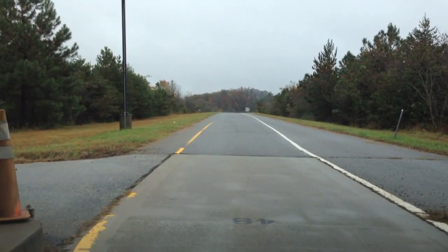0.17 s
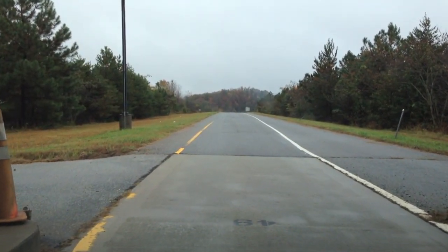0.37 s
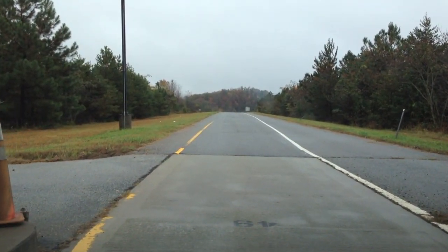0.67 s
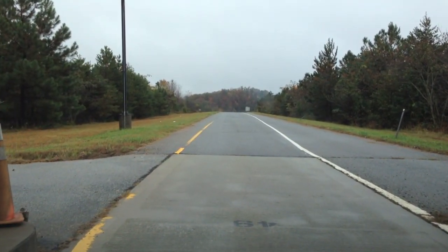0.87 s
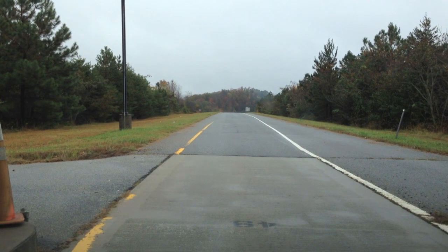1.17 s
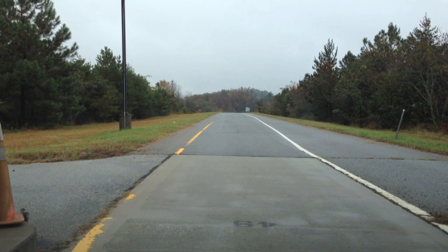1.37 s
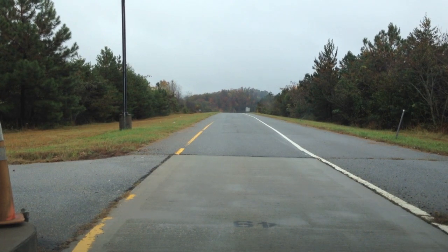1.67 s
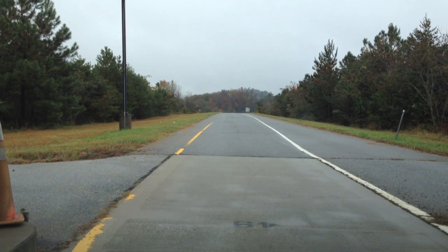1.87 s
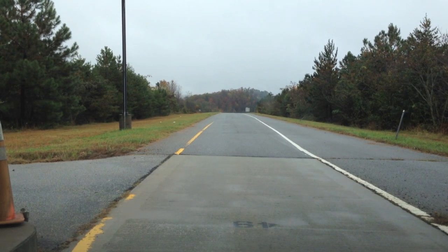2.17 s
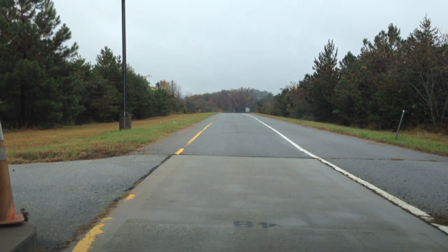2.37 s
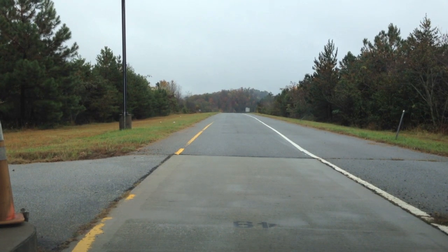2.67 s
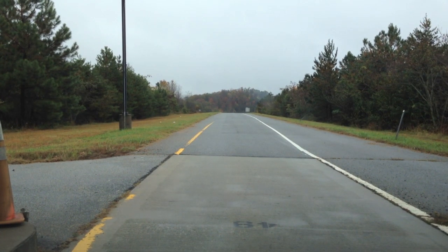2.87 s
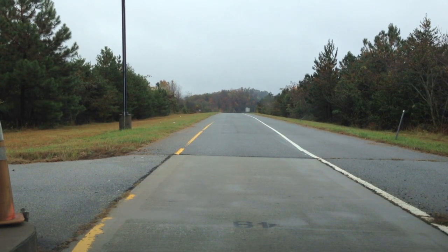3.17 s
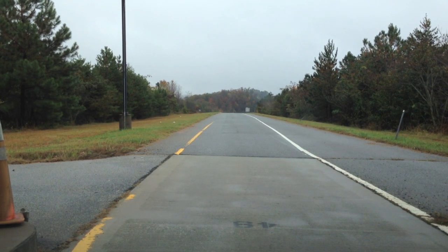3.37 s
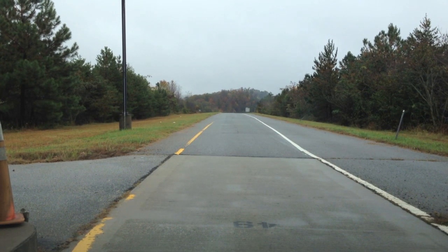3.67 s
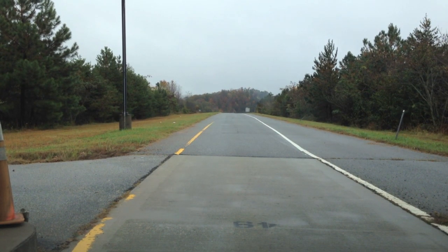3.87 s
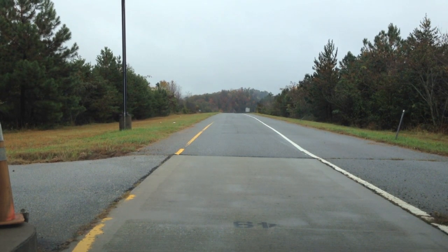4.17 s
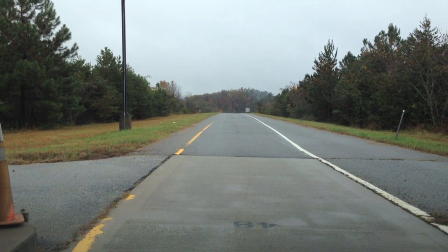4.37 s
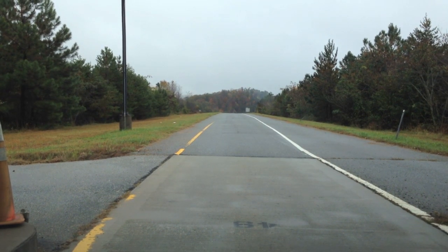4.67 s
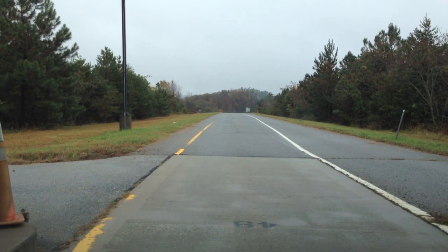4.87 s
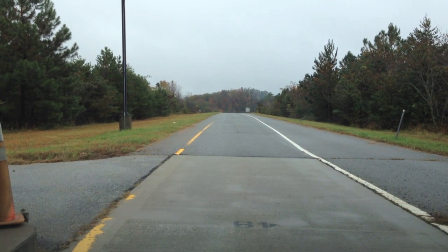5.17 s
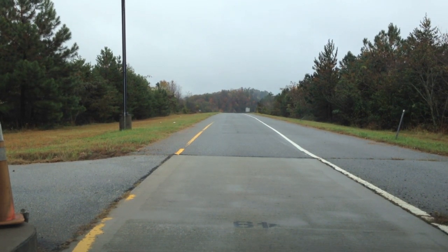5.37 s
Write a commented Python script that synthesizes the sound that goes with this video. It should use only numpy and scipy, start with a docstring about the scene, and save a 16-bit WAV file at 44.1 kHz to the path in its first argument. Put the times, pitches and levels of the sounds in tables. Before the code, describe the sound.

In an idling car at a roadside toll machine, hard knocks and door rattles frame coins clinking and rolling in a plastic basket.

```python
"""Inside a car idling at a toll machine, engine rumble, an outdoor wash and a hiss last throughout as filtered noise.
Loose door trim rattles around hard knocks: noise bursts, with damped panel and cabin modes under the knocks.
Coins click in the hand, then hit a plastic basket, glance off its steel throat and roll round the basket:
noise clinks and ringing modes, the rolling a fading run of tiny ones. At the end the knocks and rattles return."""
import sys
import numpy as np
from scipy import signal
from scipy.fft import rfft, irfft, next_fast_len
from scipy.io import wavfile
from scipy.ndimage import map_coordinates

SR = 44100
rng = np.random.default_rng(int(sys.argv[2]) if len(sys.argv) > 2 else 0)


def master(y):
    """Save y as 16-bit WAV."""
    cut = np.clip(np.atleast_2d(y).T, -1, 1)
    pcm = np.round(cut * 32767)  # scale
    wavfile.write(sys.argv[1], SR, pcm.astype(np.int16))


N = 243873

# Spectrum of a bright crack or click: (frequency [Hz], relative density [dB per Hz])
CRACK_SPECTRUM = [(900, -32), (2000, 4.5), (2550, 7.5), (3050, -11.5), (3600, -4.5), (4300, 1.5), (6300, 4),
                  (8500, -2.5), (11000, -15.5), (15000, -12)]
# Spectrum of the rap or body of a coin contact: (frequency [Hz], relative density [dB per Hz])
RAP_SPECTRUM = [(200, -12), (500, -19.5), (700, 6), (1350, 4.5), (1800, -0.5), (2500, 0), (3000, -17),
                (6000, -25.5)]
# Spectrum of a coin's scratch: (frequency [Hz], relative density [dB per Hz])
SCRATCH_SPECTRUM = [(1500, -9.5), (2800, -9), (4200, -4), (5300, 0), (6700, 2.5), (8200, -2), (9600, -9.5),
                    (11500, -15.5), (13500, -16), (15200, -9)]
# Modes of the plastic basket: (frequency [Hz], relative level [dB], t60 [s])
BASKET_MODES = [(697.5, -3.5, 0.23), (747, 1.5, 0.4), (865, 0.5, 0.18), (1095, 0.5, 0.43), (1228, -9, 0.5),
                (1311, 9, 0.19), (1572, 3, 0.086), (1800, -8, 0.4), (2155, -1.5, 0.41), (2790, -16, 0.61),
                (3440, -19, 0.77), (5400, -17, 0.45), (6400, -26, 0.27), (7040, -25, 0.3)]
# Modes of the bright ring heard with coin contacts, with a thin high whistle near 15 kHz:
# (frequency at pitch factor 1 [Hz], relative level [dB], t60 [s])
BRIGHT_MODES = [(9243, -6.5, 0.0764), (10180, -12, 0.097), (15180, -12, 0.166), (15200, -8, 0.168)]


def amp(db):
    """Level law: 20 dB is a factor of ten in amplitude."""
    return 10 ** (np.asarray(db) / 20)


def unit(x):
    """Normalisation: scale to an rms of 1."""
    return x / np.sqrt(np.mean(x ** 2) + 1e-20)


def curves(rows):
    """Linear interpolation in time: one value per sample for each column after the time."""
    s, *columns = np.transpose(rows)
    t = np.arange(N) / SR
    return [np.interp(t, s, column) for column in columns]


def wobble(rate):
    """Slow random modulation: a smooth curve through `rate` random knots a second."""
    knots = rng.standard_normal(int(N * rate / SR) + 4)
    return map_coordinates(knots, [np.arange(N) * rate / SR])


def noise(spectrum, size, peaky_db=0, spacing_hz=55):
    """Spectral shaping: noise of rms 1, coloured by a spectrum and fresh narrow resonances."""
    hz, db = np.transpose(spectrum)
    grid = np.fft.rfftfreq(size, 1 / SR)
    peaks = map_coordinates(rng.standard_normal(SR // 20), [grid / spacing_hz], mode="wrap")
    colour_db = np.interp(np.log(grid + 1), np.log(hz), db)
    gain = amp(colour_db + peaky_db * np.tanh(peaks / 2) * 2)
    white = rfft(rng.standard_normal(size))
    return unit(irfft(white * gain, size))


def fade(rise, t60):
    """Exponential damping: half a second that swells with time constant `rise` and falls 60 dB per t60."""
    t = np.arange(SR // 2) / SR
    swell = 1 - np.exp(-t / max(rise, 1 / SR))
    return swell * amp(-60 * t / t60)


def burst(spectrum, rise, t60, tail_db, tail_t60, peaky_db=0):
    """Early reflections and reverberation: a smeared contact with a weaker, longer tail."""
    envelope = np.hypot(fade(rise, t60), amp(tail_db) * fade(rise, tail_t60))
    sound = noise(spectrum, SR // 2, peaky_db) * envelope
    return unit(sound) * np.sqrt(np.mean(envelope ** 2))  # the envelope sets the energy


def ring(modes, rise, vary_db, pitch=1, rough=0):
    """Modal superposition: damped sines share the energy anew at each blow; chatter roughens their phase."""
    t = np.arange(SR // 2) / SR
    gains = amp(np.transpose(modes)[1] + vary_db * rng.standard_normal(len(modes)))
    gains *= np.sqrt(2) / np.linalg.norm(gains)  # rms 1 before the envelope
    gains *= (-1) ** np.arange(len(modes))  # neighbouring modes swing opposite ways
    total = np.zeros(len(t))
    for gain, (hz, _, t60) in zip(gains, modes):
        drift = rough * np.cumsum(rng.standard_normal(len(t))) / np.sqrt(SR)  # random walk, in cycles
        total += gain * np.sin(2 * np.pi * (pitch * hz * t + drift)) * fade(rise, t60)
    return total


def add(track, s, sound):
    """Linear superposition: mix a sound into the track at time s."""
    part = track[round(s * SR):][:len(sound)]
    part += sound[:len(part)]


def background():
    """Broadband noise: rumble, wash and a hiss that steps up, sags and drops back, all slightly unsteady."""
    # Levels before a constant trim and wobble: (time [s], engine level [dB], outdoor wash level [dB])
    air_levels = [(0.0, -53, -60), (1.79, -48, -54), (2.5, -50.5, -54.5), (2.93, -48, -49.5),
                  (3.68, -47.5, -53.5), (4.1, -50, -55), (4.79, -52.5, -50), (5.53, -53.5, -56)]
    # Spectra of engine, wash and hiss: (frequency [Hz], relative density [dB per Hz])
    engine_spectrum = [(18, -76), (30, -72.5), (54, -19), (108, -5.5), (140, -1.5), (199, -1), (256, -6.5),
                       (286, -4.5), (368, -8), (497, -15), (600, -13.5), (780, -21.5), (1320, -120)]
    wash_spectrum = [(90, -10), (260, -5), (450, -7), (1060, -0.5), (1200, -7.5), (1350, -2), (1520, -11.5),
                     (1630, -8), (3200, -33), (4160, -45), (7040, -120)]
    hiss_spectrum = [(1650, 2), (2800, -3), (3390, -9), (4000, -5), (5060, -4), (6450, -1), (9830, -14),
                     (12000, -18), (14600, -13.5), (15400, -26.5)]
    # Stretches of stronger hiss: (start [s], end [s], rise [dB], sag [dB per s])
    hiss_swells = [(.75, 0.885, 7.5, 3), (1.39, 2.316, 8.5, 5.5), (2.8, 4.58, 5, 0.1)]
    resting_hiss_db, ramp_s = -63, 0.055
    engine_db, wash_db = curves(air_levels)
    t = np.arange(N) / SR
    hiss_db = np.full(N, resting_hiss_db, dtype=float)
    for start, end, rise_db, sag in hiss_swells:
        ramp = np.clip(np.minimum(t - start, end - t) / ramp_s, 0, 1)
        hiss_db += (rise_db - sag * (t - start)) * ramp
    engine = amp(engine_db + 0.75 + 1.26 * wobble(9)) * noise(engine_spectrum, N)
    wash = amp(wash_db - 2.02 + 0.22 * wobble(14)) * noise(wash_spectrum, N)
    hiss = amp(hiss_db + 0.36 * wobble(10)) * noise(hiss_spectrum, N)
    return engine + wash + hiss


def blow(clack_db, crack_db, t60):
    """Contact spectrum: a plastic clack, duller where the crack is relatively weak, and a brighter crack."""
    # Spectrum of the clack before tilting: (frequency [Hz], relative density [dB per Hz])
    clack_spectrum = [(250, -19), (550, 4.5), (720, 2), (950, -1.5), (1300, -5), (1800, -11.5), (2600, -17),
                      (3300, -25.5), (8000, -44)]
    usual_crack_db = -23  # crack over clack at which the clack keeps its colour
    dulling = 0.33  # dB per octave of tilt for each dB of crack
    tilt = dulling * min(crack_db - clack_db - usual_crack_db, 10)
    colour = [(hz, db + tilt * np.log2(hz)) for hz, db in clack_spectrum]
    clack = burst(colour, 0.0013, t60, tail_db=-30.5, tail_t60=0.35, peaky_db=3)
    crack = burst(CRACK_SPECTRUM, 0.0028, 0.94 * t60, tail_db=-35, tail_t60=0.285, peaky_db=-0.5)
    return amp(clack_db) * clack + amp(crack_db) * crack


def rattles():
    """Light impacts: loose trim parts clack and crack around the hard knocks, too light to thump."""
    # Rattling contacts: (time [s], clack strength [dB], crack over clack [dB])
    rattle_hits = [(.092, -48, -20), (1.292, -40, -28), (1.312, -34, 0), (1.398, -47.5, 7),
                   (1.53, -42, -26), (1.685, -49, 2.5), (4.51, -20, -26), (4.522, -21.5, -26),
                   (4.608, -21.5, -24), (4.658, -57, 11), (4.669, -34, -22), (4.736, -46.5, -18),
                   (4.81, -41, -24), (4.893, -53, -25)]
    out = np.zeros(N)
    for s, db, crack_db in rattle_hits:
        add(out, s, blow(db, db + crack_db, t60=0.077))
    return out


def knocks():
    """Impact excitation: blows set panel modes and the cabin air ringing, the air more strongly for heavy ones."""
    # Knocks: (time [s], strength [dB], clack over strength [dB], crack over strength [dB], clack t60 [s])
    knock_hits = [(.289, -41, -5.5, -14.5, 0.13), (.357, -46.5, -1.5, -9, 0.097),
                  (1.085, -33.5, -11, -26, 0.14), (1.092, -21, -4.5, -32, 0.092),
                  (1.119, -37, -4, -13, 0.14), (1.148, -28.5, -1, -33, 0.091),
                  (1.318, -12, -5, -13.5, 0.067), (1.437, -40.5, 0, -30, .12),
                  (1.617, -44.5, -11, -27, 0.12), (2.25, -37, -6, -22.5, .15),
                  (4.535, -10, -2.5, -18.5, 0.073), (4.555, -21.5, -5, -14, 0.16),
                  (4.565, -16, -13, -30, 0.12), (4.599, -29.5, -6, -9, 0.062),
                  (4.627, -34.5, -15, -13.5, 0.2)]
    # Spectrum of the dull thump: (frequency [Hz], relative density [dB per Hz])
    thump_spectrum = [(40, -30), (110, -26), (190, 2.5), (290, -2), (390, -2.5), (455, -23.5), (560, -26),
                      (800, -8), (2000, -76.5)]
    # Modes of the door panel and of the cabin air: (frequency [Hz], relative level [dB], t60 [s])
    panel_modes = [(194.1, 0.5, 0.21), (226.6, -14, 0.2), (291, 5.5, 0.11), (330, -16, 0.17),
                   (348, 0.5, 0.087), (403.6, -0.5, 0.11), (542, -8.5, 0.13), (695.6, -20, 0.16),
                   (875, -25, 0.17), (887, -18, 0.17), (1260, -24, 0.147)]
    cabin_modes = [(69.8, -8.5, 0.41), (89, -12, 0.26), (128.7, 10.5, 0.25)]
    panel_db = -1  # panel ring over the strength of the knock
    # Boom of a 0 dB knock of usual length; its growth in dB per dB of strength
    boom_base_db, boom_growth = -3, 1.177
    boom_db_per_s, usual_t60_s = 128, 0.114  # a longer, heavier knock pushes more air
    out = np.zeros(N)
    for s, db, clack_db, crack_db, t60 in knock_hits:
        boom_db = boom_base_db + boom_growth * db + boom_db_per_s * (t60 - usual_t60_s)
        thump = burst(thump_spectrum, 0.0015, 1.46 * t60, tail_db=-35, tail_t60=0.16)
        add(out, s, amp(db) * thump)
        add(out, s, blow(db + clack_db, db + crack_db, t60))
        add(out, s, amp(db + panel_db) * ring(panel_modes, rise=0.0016, vary_db=1))
        add(out, s, amp(boom_db) * ring(cabin_modes, rise=0.011, vary_db=3))
    return out


def handling():
    """Damping by touch: coins pinched and slid in the fingers click without ringing."""
    # Contacts in the hand: (time [s], click level [dB], body over click [dB], slide [s])
    hand_clicks = [(0.712, -44, -9, .001), (.724, -27, -6.5, 0.0033), (.916, -44.5, -4.5, .0004),
                   (.95, -49.5, 7.5, 0.00045), (2.429, -61, -6, .001), (2.464, -52.5, 11.5, 0.00081),
                   (2.534, -55, 17, 0.0038), (2.641, -59.5, 14.5, .0002)]
    pinch_t60_s = 0.056
    out = np.zeros(N)
    for s, db, body_db, slide in hand_clicks:
        click = burst(CRACK_SPECTRUM, slide, pinch_t60_s, tail_db=-36.5, tail_t60=0.26)
        body = burst(RAP_SPECTRUM, slide, pinch_t60_s, tail_db=-13, tail_t60=0.22)
        add(out, s, amp(db) * click)
        add(out, s, amp(db + body_db) * body)
    return out


def clink(modes, click_db, wall_db, part_db, bright_db, pitch, slide, t60):
    """Coupled impact: a scratch with fresh partials, a wall rap, the struck part's ring and a bright ring."""
    chatter, vary_db = 1.5, 3
    own_pitch = pitch * (1 + 0.012 * rng.standard_normal())  # drawn anew at each contact
    scratch = burst(SCRATCH_SPECTRUM, slide, t60, tail_db=-17.5, tail_t60=0.42, peaky_db=6.5)
    rap = burst(RAP_SPECTRUM, slide, t60, tail_db=-29, tail_t60=0.37, peaky_db=10.5)
    part = ring(modes, slide, vary_db, rough=chatter)
    bright = ring(BRIGHT_MODES, slide, vary_db, pitch=own_pitch, rough=chatter)
    return amp(click_db) * scratch + amp(wall_db) * rap + amp(part_db) * part + amp(bright_db) * bright


def basket():
    """Contact duration: square hits on the plastic are short; glancing ones scrape on for longer."""
    # Hits, slide near 0 if square and long if glancing:
    # (time [s], strength [dB], wall rap over strength [dB], basket ring over strength [dB], slide [s])
    basket_contacts = [(2.67, -42, 1.5, -3, 0.00016), (2.7655, -40.5, 7.5, 5.5, 0.00037),
                       (2.778, -41, 7.5, -17, 0.00035), (2.801, -36.5, 10, -4, .0002),
                       (2.831, -52, 11, 3, .0005), (2.861, -41.5, 6.5, -17, 0.00025),
                       (2.893, -48, 9, -9, 0.00084), (2.9545, -49.5, 4, -15, .0002),
                       (3.413, -26, -7.5, -9.5, .0025), (3.476, -29, -16, -17, 0.0024),
                       (3.698, -41.5, 4, -20, .0005), (3.705, -27.5, -10, -7, .0024),
                       (3.757, -31.5, -16, -2, 0.00046), (3.768, -33, -7, -6, 0.0038),
                       (3.829, -34, -25, -7.5, 0.0022), (3.937, -47.5, -6, -12, .003),
                       (3.985, -49, -10, -13, 0.0039)]
    square_t60_s, t60_per_slide = 0.064, 16
    bright_over_rap_db = -11
    out = np.zeros(N)
    for s, db, wall_db, ring_db, slide in basket_contacts:
        t60 = square_t60_s + t60_per_slide * slide
        bright_db = db + wall_db + bright_over_rap_db
        add(out, s, clink(BASKET_MODES, db, db + wall_db, db + ring_db, bright_db, 1, slide, t60))
    return out


def throat():
    """Modal scaling: a larger coin, so lower in pitch, glances off the steel with one fixed long slide."""
    # Glancing contacts: (time [s], strength [dB], throat ring over strength [dB])
    throat_contacts = [(2.966, -40, 8), (2.998, -45, 10), (3.017, -49, 9), (3.054, -47.5, 0),
                       (3.128, -41.5, -3), (3.194, -38.5, -7), (3.204, -32, -1.5), (3.269, -43.5, 1),
                       (3.296, -41.5, 6.5), (3.345, -42.5, -1)]
    # Modes of the steel throat: (frequency [Hz], relative level [dB], t60 [s])
    throat_modes = [(1290, -10.5, 0.31), (1634, -4, 0.15), (1780, -6.5, 0.31), (1943, -2, 0.22),
                    (2100, -17, 0.35), (2500, -0.5, 0.2), (2510, -2.5, 0.22), (3035, -4.5, 0.1),
                    (3460, 4.5, 0.092), (3650, 4, 0.071), (3880, -2, 0.13), (4270, -1.5, 0.2),
                    (5150, -13, 0.28), (5300, -13, 0.15), (6800, -21, 0.15), (7350, -6, 0.16),
                    (7490, -13, 0.214), (8320, -6, 0.18)]
    bright_db = -48  # the bright ring has the same level at every touch
    out = np.zeros(N)
    for s, db, ring_db in throat_contacts:
        sound = clink(throat_modes, db, db, db + ring_db, bright_db, pitch=0.97, slide=0.0033, t60=0.13)
        add(out, s, sound)
    return out


def rolling(rate=80, size_db=2.5, basket_db=-9, shimmer_db=-12):
    """Repeated micro-impacts: rolling rims make uneven fading clinks that excite basket and bright modes."""
    # Coins rolling round the basket: (start [s], length [s], starting level [dB])
    swirl_runs = [(3.054, .08, -52.5), (3.25, 0.13, -40.5), (3.439, .2, -40), (3.76, .14, -42.5),
                  (3.901, 0.15, -59)]
    sag_db_per_s = 53  # a rolling coin loses speed
    out, blows = np.zeros(N), np.zeros(N)
    shape = fade(0.0018, 0.11)[:SR // 10]
    for start, length, db in swirl_runs:
        for step in np.arange(0, length, 1 / rate):
            age = step + rng.random() / rate
            gain = amp(db - sag_db_per_s * age + size_db * rng.standard_normal())
            add(out, start + age, gain * shape * noise(SCRATCH_SPECTRUM, len(shape), peaky_db=8))
            blows[round((start + age) * SR)] = gain
    answer = amp(basket_db) * ring(BASKET_MODES, 0.0028, vary_db=1.5, rough=8.5)
    answer += amp(shimmer_db) * ring(BRIGHT_MODES, 0.0032, vary_db=2, rough=1.9)
    return out + signal.oaconvolve(blows, answer)[:N]


def scene():
    """Linear superposition: all sources sum into one channel."""
    cabin = background() + rattles() + knocks()
    coins = handling() + basket() + throat() + rolling()
    return (cabin + coins)[None]


def record(dry):
    """Band limitation: the microphone thins the deep bass and keeps nothing above its upper limit."""
    low_cut_hz, top_hz = 75, 15400
    high_pass = signal.butter(2, low_cut_hz, "highpass", fs=SR, output="sos")
    thin = signal.sosfilt(high_pass, dry)
    size = next_fast_len(N + SR // 2)
    passband = np.fft.rfftfreq(size, 1 / SR) < top_hz
    return irfft(rfft(thin, size) * passband, size)[:, :N]


dry = scene()
out = record(dry)
master(out)
```